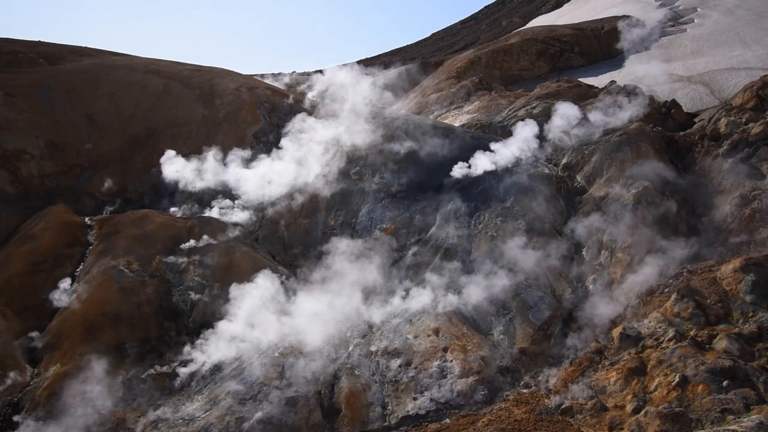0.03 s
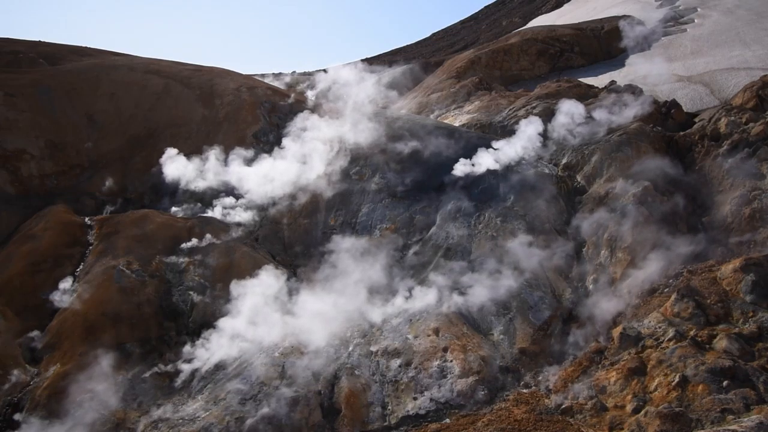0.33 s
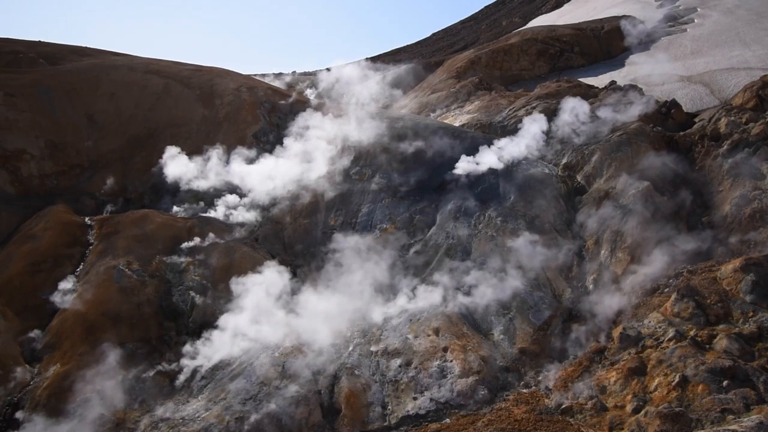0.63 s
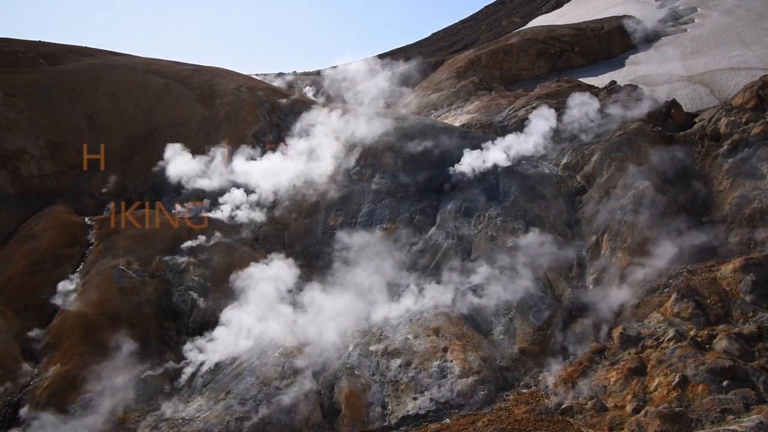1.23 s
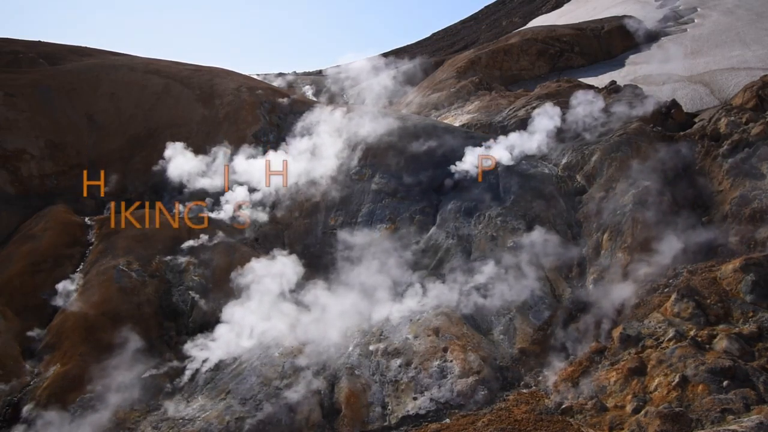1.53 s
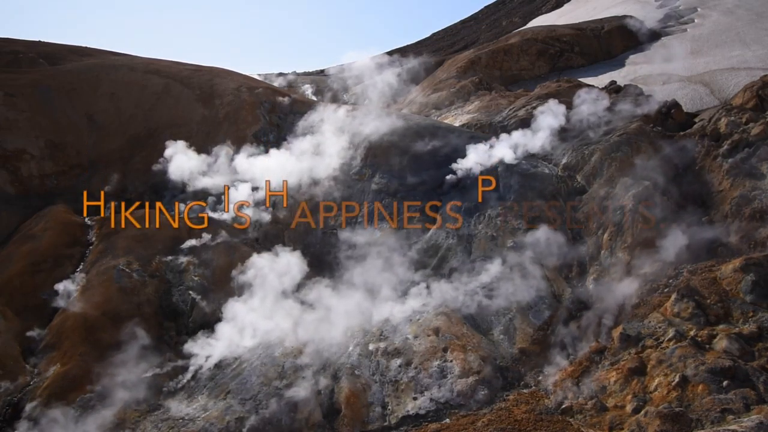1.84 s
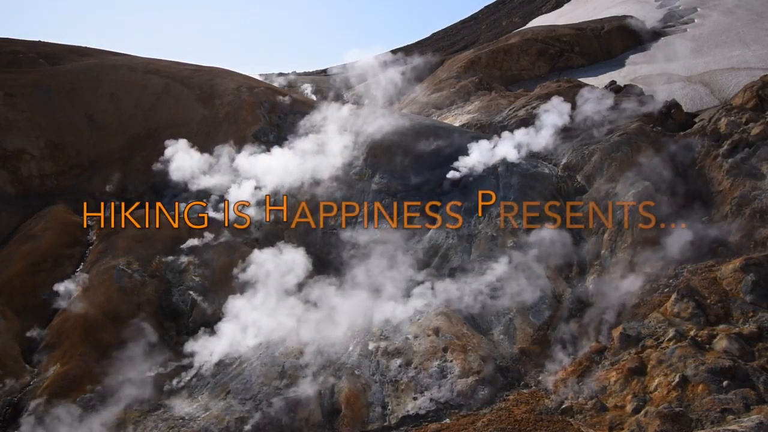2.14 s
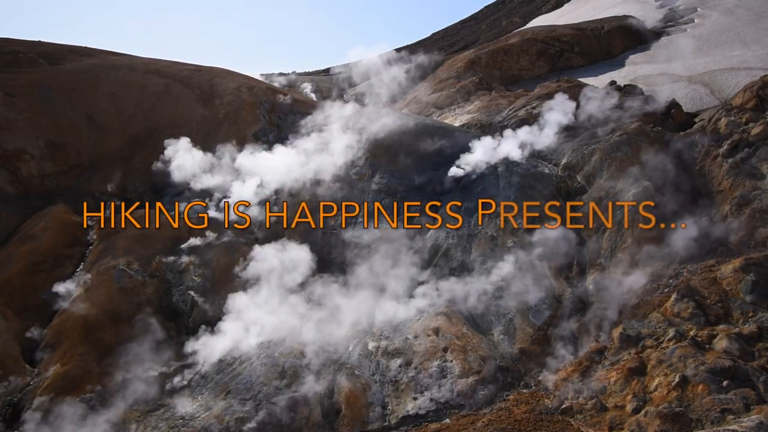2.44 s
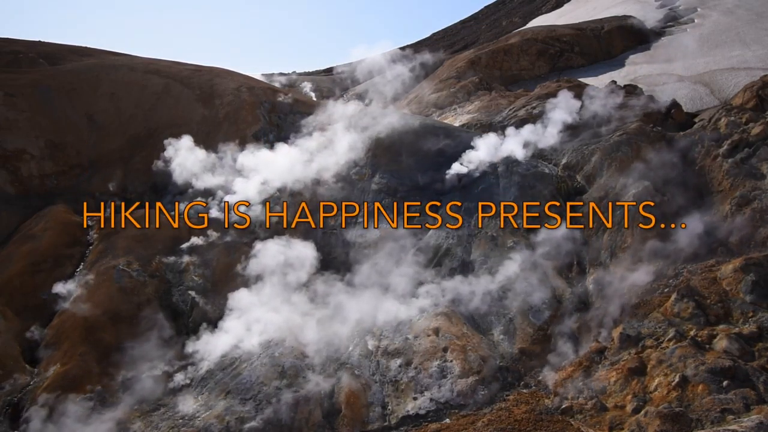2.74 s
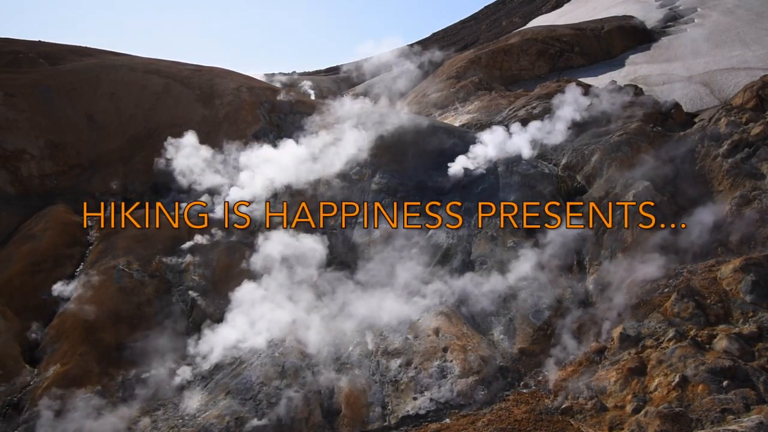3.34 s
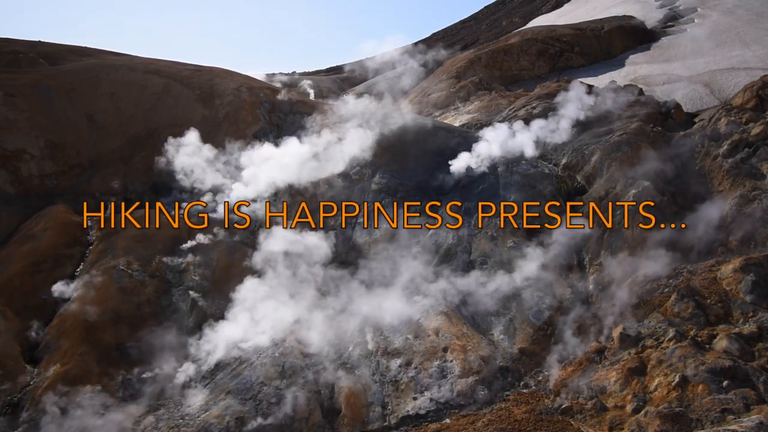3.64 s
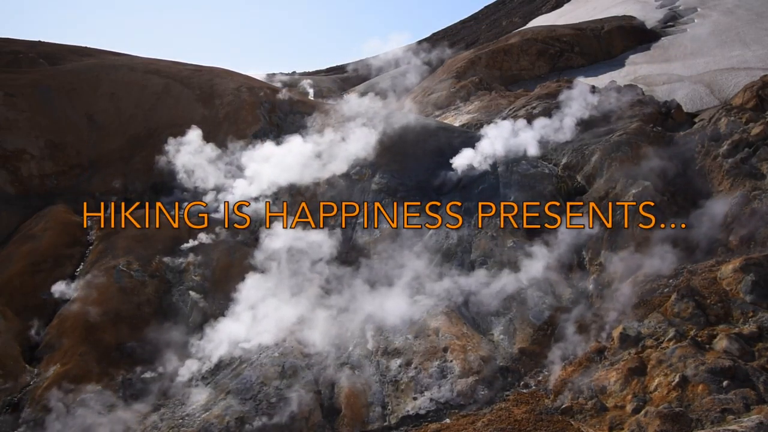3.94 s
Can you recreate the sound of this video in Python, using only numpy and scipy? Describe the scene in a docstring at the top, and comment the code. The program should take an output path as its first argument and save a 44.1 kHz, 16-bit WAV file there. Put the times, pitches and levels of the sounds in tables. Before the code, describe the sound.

Steam rushes from ground vents with a steady roar and hiss on an open hillside.

```python
"""A steady rush of steam is heard first, from vents in the ground on a distant, open hillside.
Swirling steam makes the wide vents roar and now and then surge, while jets from narrow cracks hiss.
Roar and hiss both get a little louder and softer as the steam flow slowly changes.
A light wind bumps the microphone a few times. The sound is mono."""
import sys
import numpy as np
from scipy import signal
from scipy.fft import rfft, irfft
from scipy.io import wavfile

SR = 44100
rng = np.random.default_rng(int(sys.argv[2]) if len(sys.argv) > 2 else 0)


def unload_wav(signal):
    """Save mono or channel-first audio to the path in sys.argv[1] as 16-bit WAV at rate SR, clipped to [-1, 1]."""
    wavfile.write(
        sys.argv[1],
        SR,
        np.round(np.clip(np.atleast_2d(signal).T, -1, 1) * 32767).astype(np.int16),
    )


N = 176400

# Wind bumps on the microphone: t/s, length/s, centre f/Hz, peak level/dB
WIND_BUMPS = [(.205, .05, 62, -59), (0.683, 0.023, 110, -54), (2.151, 0.021, 175, -45),
              (2.335, 0.032, 145, -50.5), (2.516, 0.022, 180, -49), (2.614, 0.044, 188, -44),
              (2.977, .025, 110, -55.5), (3.18, .03, 90, -57), (3.384, 0.032, 169, -45)]
# Brief surges of single vents: t/s, length/s, centre f/Hz, peak level/dB
VENT_SURGES = [(.82, 0.077, 1200, -43), (1.184, 0.054, 1250, -40), (1.787, 0.05, 410, -44.5),
               (2.065, 0.067, 840, -43)]
# Strength of the steam flow (only its rise and fall counts): t/s, roar level/dB, hiss level/dB
STEAM_FLOW = [(0.12, -38, -45), (0.3, -37.5, -43.5), (0.71, -37.5, -46), (0.8, -37, -46), (0.85, -37, -45),
              (1.32, -36.5, -43.5), (1.98, -38.5, -46.5), (2.43, -37, -44.5), (3.22, -36.5, -43.5),
              (3.6, -37.5, -45.5), (4.0, -38, -46)]
# Tone colour of the narrow cracks: f/Hz, relative level/dB
HISS_SPECTRUM = [(1500, -26), (3000, -0.5), (4000, 0.5), (5000, 0.5), (5700, -.7), (6850, -.7), (7500, -6),
                 (8300, -8.5), (10000, -22.5), (11500, -31), (15500, -44)]
# Tone colour of the wide vents: f/Hz, relative level/dB
ROAR_SPECTRUM = [(20, -37), (58, -16), (90, -20.5), (170, -9.5), (310, -5), (420, -2), (540, 1), (660, -.8),
                 (820, 0.5), (1380, -0.2), (2000, -2.5), (2700, -4.5), (4000, -14), (8000, -50)]


def amp(db):
    """Turns decibels into a number to multiply a sound by."""
    return 10 ** (np.asarray(db) / 20)


def unit(x):
    """Scales a signal so that its average strength (rms) is one."""
    return x / np.sqrt(np.mean(x ** 2) + 1e-20)


def level_at(spectrum, hz):
    """Looks up levels in dB between a spectrum's points, on a log-frequency scale."""
    f, db = np.transpose(spectrum)
    return np.interp(np.log(hz + 1), np.log(f + 1), db)


def wander(t, slow_hz, fast_hz):
    """A random wobble: slow sine waves added up, each starting anywhere in its cycle."""
    rates = np.geomspace(slow_hz, fast_hz, num=30)
    return unit(sum(np.sin(2 * np.pi * (f * t + rng.random())) / np.sqrt(f) for f in rates))


def turbulence(spectrum, patch_db, patch_s, patch_hz):
    """Rushing noise in which eddies (small swirls) lift and lower patches of the spectrum."""
    size, hop = 1024, 256
    hz = np.fft.rfftfreq(size, 1 / SR)
    real, imag, eddies = rng.standard_normal((3, N // hop + 5, len(hz)))
    # Blur random values over time and frequency to get smooth patches.
    rate = np.fft.fftfreq(len(eddies), hop / SR)[:, None]
    ripple = np.fft.fftfreq(len(hz), hz[1])
    blur = np.exp(-2 * (rate * patch_s) ** 2 - 2 * (ripple * patch_hz) ** 2)
    eddies = unit(np.fft.ifft2(np.fft.fft2(eddies) * blur).real)
    frames = (real + 1j * imag) * amp(level_at(spectrum, hz) + patch_db * eddies)
    _, noise = signal.istft(frames.T, nperseg=size, noverlap=size - hop)
    return unit(noise[:N])


def puff(t, peak_s, length_s, centre_hz, level_db, width_octaves):
    """A short swell of swirling air around one frequency."""
    hz = np.fft.rfftfreq(N, 1 / SR)
    band = np.exp(-.5 * (np.log2((hz + 1) / centre_hz) / width_octaves) ** 2)
    air = irfft(rfft(rng.standard_normal(N)) * band, N)
    swell = np.exp(-2 * ((t - peak_s) / length_s) ** 2)
    return amp(level_db) * unit(air * swell) * np.sqrt(np.mean(swell ** 2))


def flow_db(t, column):
    """How far the steam flow is above or below its average."""
    rows = np.array(STEAM_FLOW)
    db = np.interp(t, rows[:, 0], rows[:, column])
    return db - db.mean()


def wind(t):
    """Light wind hits the microphone in soft, low bumps."""
    return sum(puff(t, *bump, width_octaves=0.67) for bump in WIND_BUMPS)


def surges(t):
    """Now and then a single vent lets out a brief extra rush of steam."""
    return sum(puff(t, *surge, width_octaves=0.4) for surge in VENT_SURGES)


def crack_hiss(t, level_db=-45, flow_share=0.91, flutter_db=0.19):
    """Steam jets from narrow cracks make a smooth hiss, its highest part dulled by distance."""
    jets = turbulence(HISS_SPECTRUM, patch_db=0.43, patch_s=0.09, patch_hz=1200)
    flutter = flutter_db * wander(t, slow_hz=2, fast_hz=10)
    return jets * amp(level_db + flow_share * flow_db(t, column=2) + flutter)


def vent_roar(t, level_db=-36.5, flow_share=0.93, flutter_db=0.1):
    """Steam swirls out of the wide vents with a roar that follows the flow and flutters slightly."""
    rush = turbulence(ROAR_SPECTRUM, patch_db=0.56, patch_s=0.087, patch_hz=493)
    flutter = flutter_db * wander(t, slow_hz=2.5, fast_hz=14)
    return rush * amp(level_db + flow_share * flow_db(t, column=1) + flutter)


def scene():
    """Steam and wind together, the same in both ears."""
    t = np.arange(N) / SR
    mono = vent_roar(t) + crack_hiss(t) + surges(t) + wind(t)
    return np.array([mono, mono])


def record(dry):
    """Fades the sound in quickly and cuts off the very highest treble."""
    start_s, fade_s, cutoff_hz = 0.08, 0.011, 15720
    fade = np.clip((np.arange(N) / SR - start_s) / fade_s, 0, 1)
    lowpass = signal.firwin(1023, cutoff_hz, window=("kaiser", 9), fs=SR)
    return signal.oaconvolve(dry * fade, lowpass[None], "same")


dry = scene()
out = record(dry)
unload_wav(out)
```